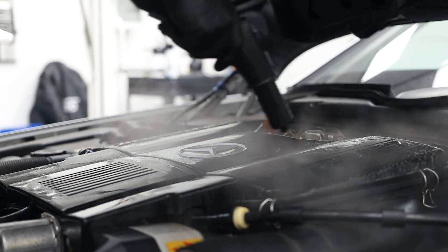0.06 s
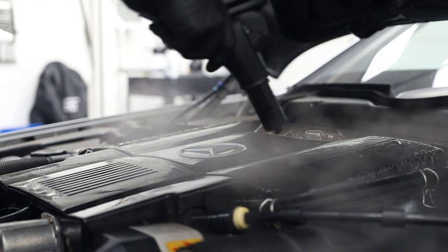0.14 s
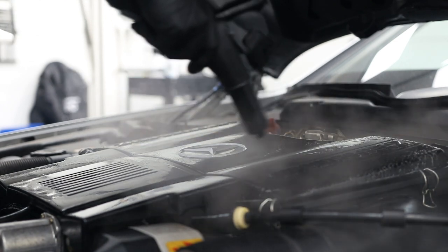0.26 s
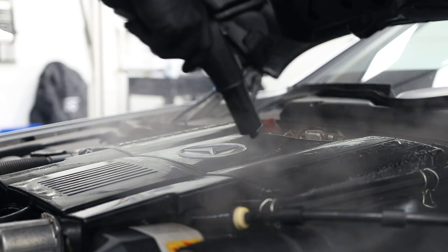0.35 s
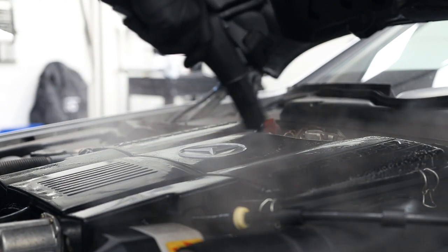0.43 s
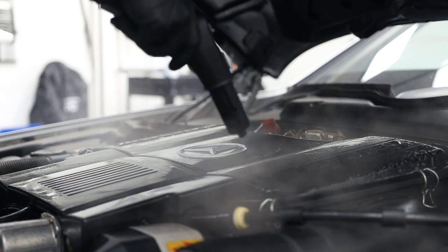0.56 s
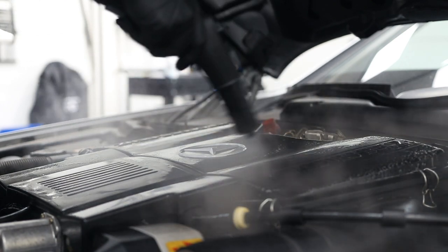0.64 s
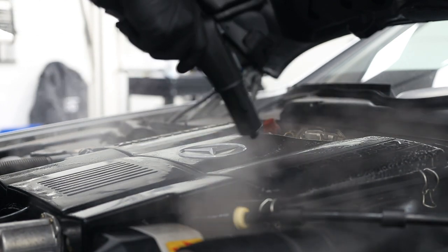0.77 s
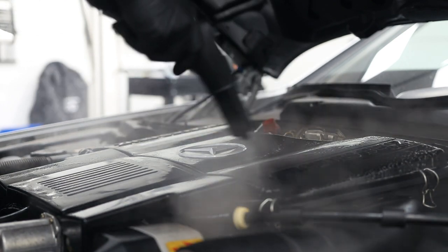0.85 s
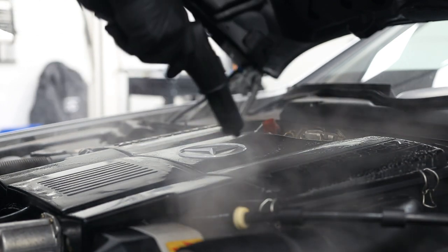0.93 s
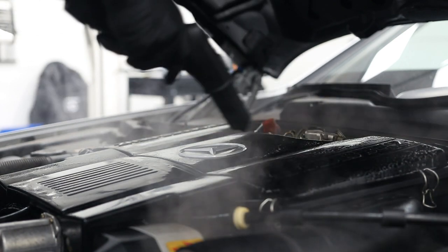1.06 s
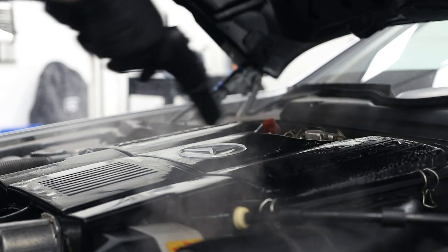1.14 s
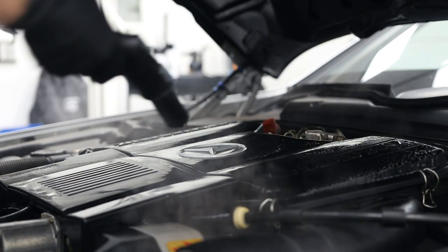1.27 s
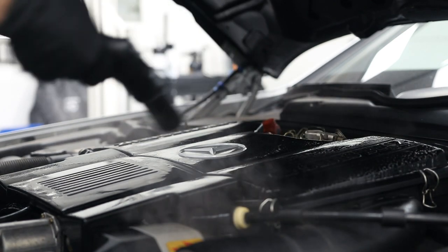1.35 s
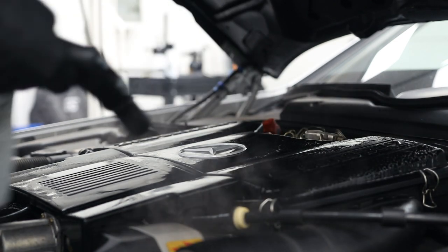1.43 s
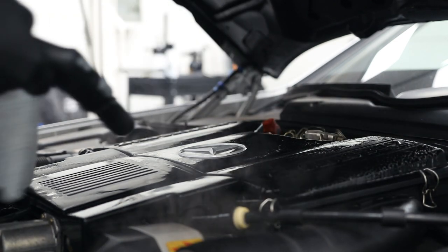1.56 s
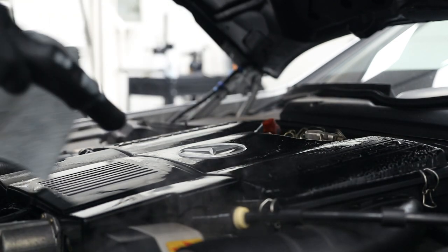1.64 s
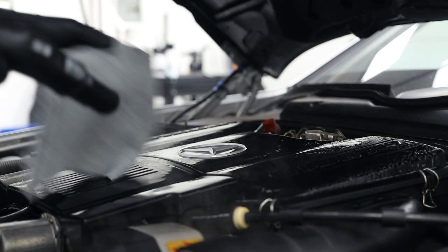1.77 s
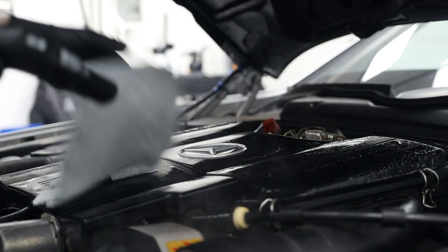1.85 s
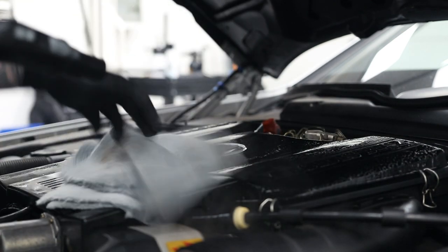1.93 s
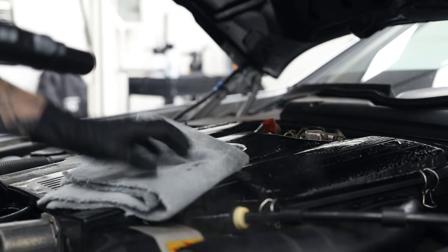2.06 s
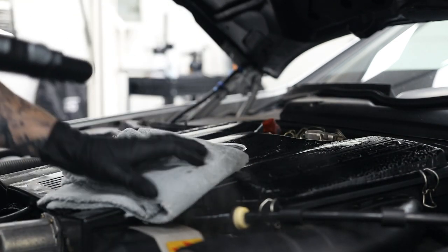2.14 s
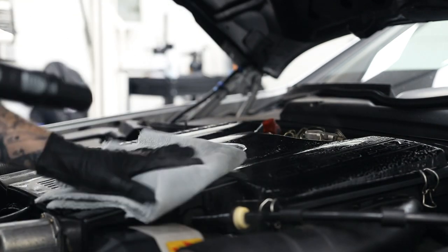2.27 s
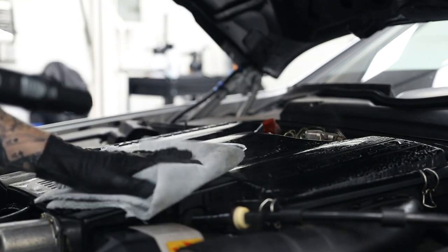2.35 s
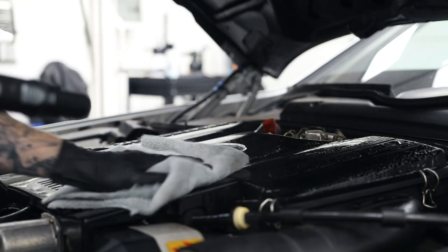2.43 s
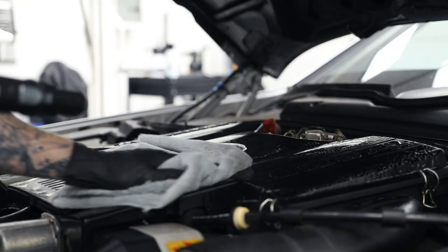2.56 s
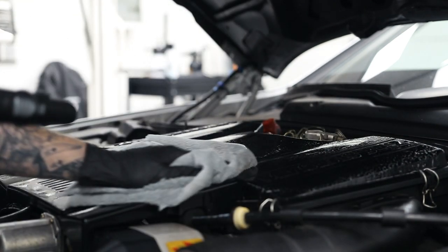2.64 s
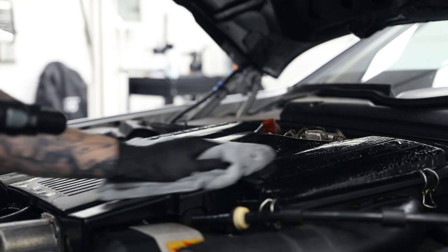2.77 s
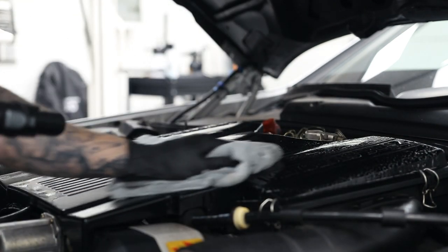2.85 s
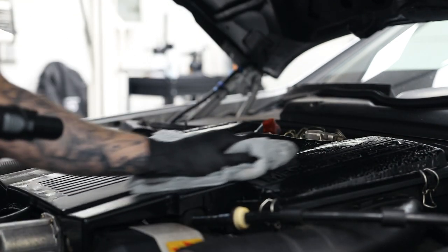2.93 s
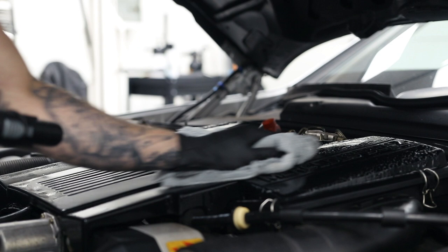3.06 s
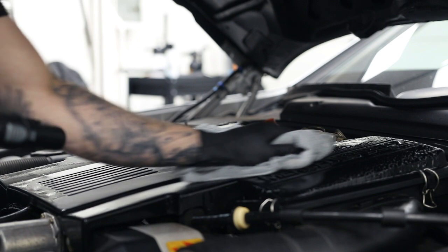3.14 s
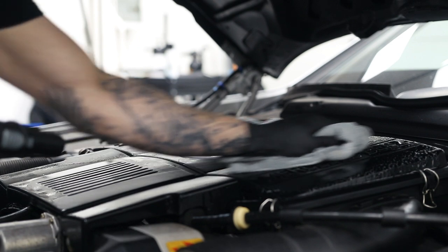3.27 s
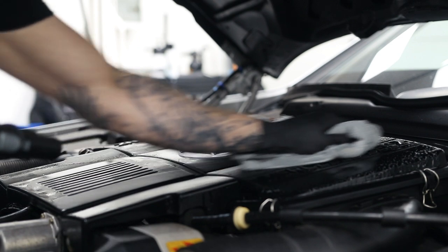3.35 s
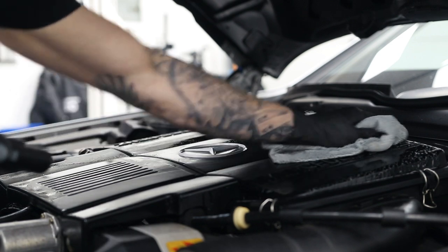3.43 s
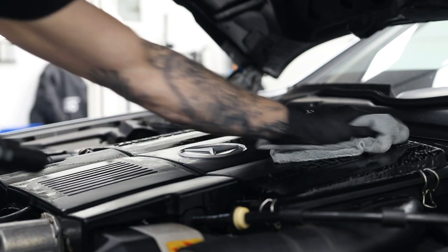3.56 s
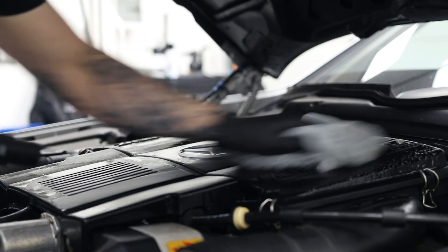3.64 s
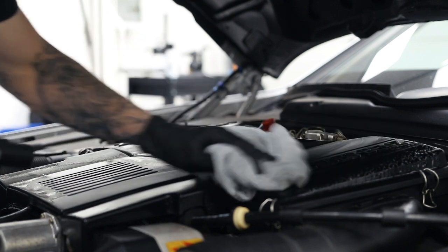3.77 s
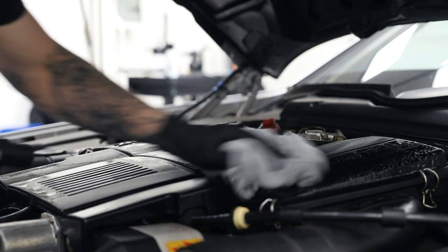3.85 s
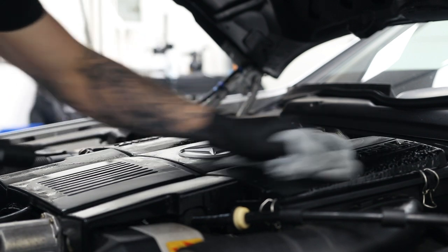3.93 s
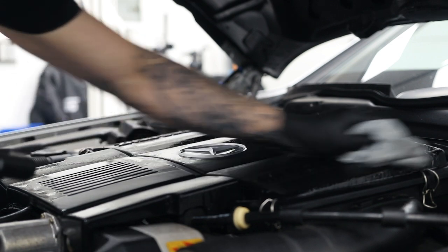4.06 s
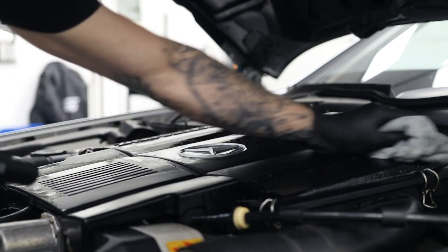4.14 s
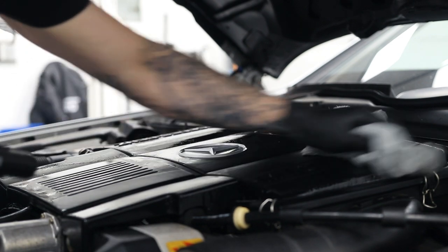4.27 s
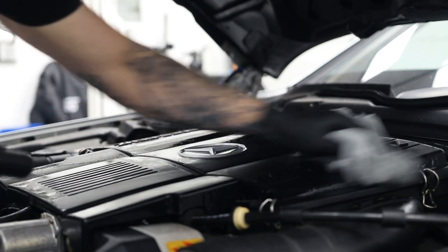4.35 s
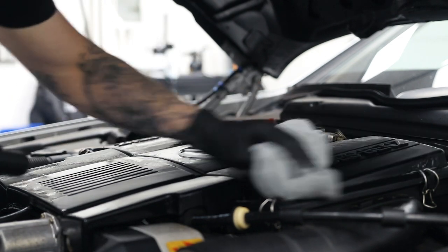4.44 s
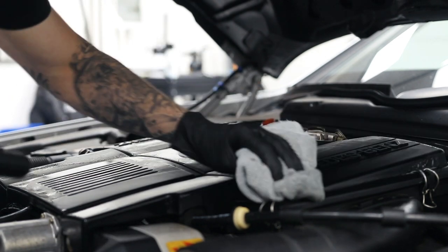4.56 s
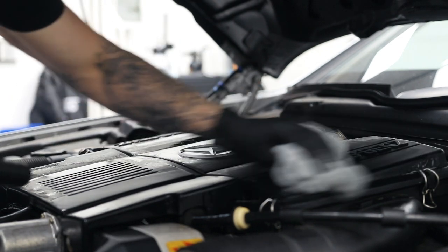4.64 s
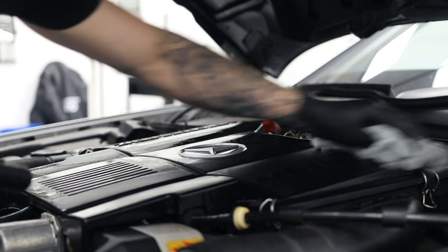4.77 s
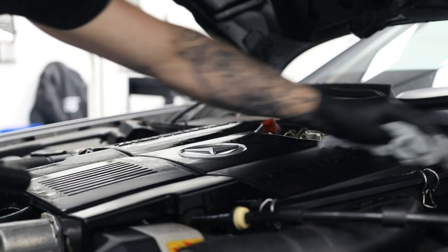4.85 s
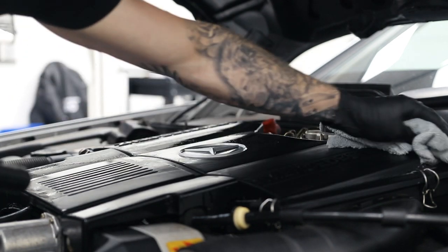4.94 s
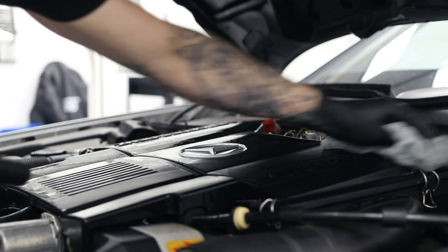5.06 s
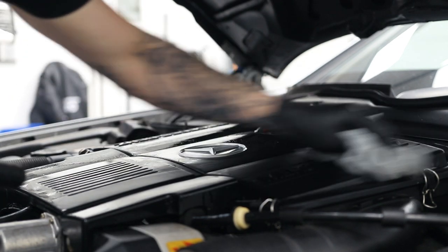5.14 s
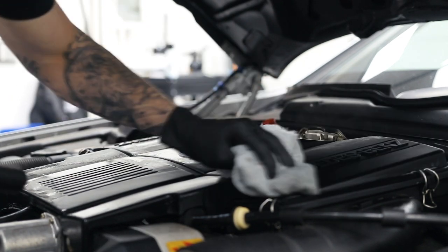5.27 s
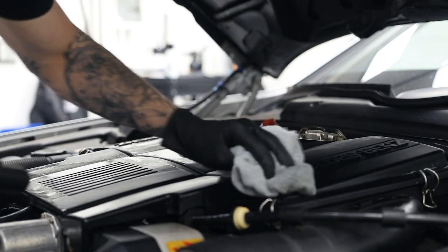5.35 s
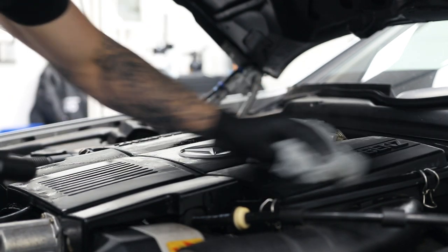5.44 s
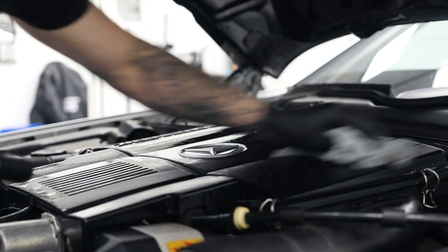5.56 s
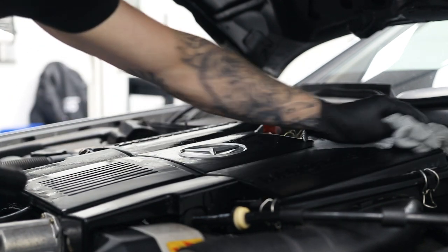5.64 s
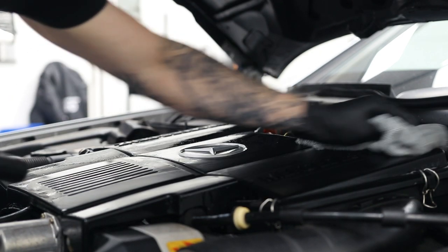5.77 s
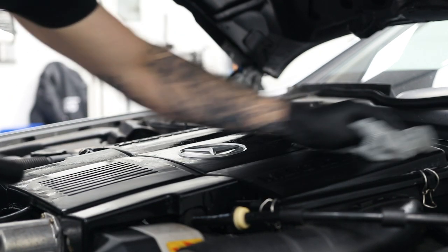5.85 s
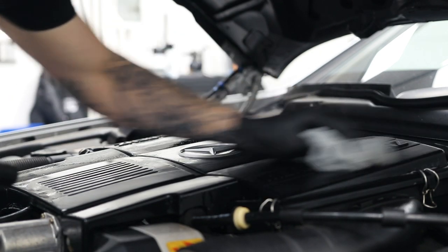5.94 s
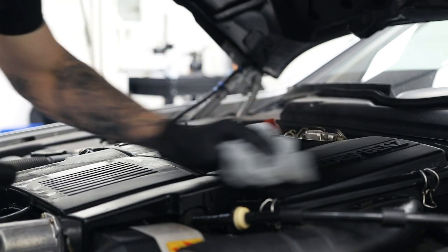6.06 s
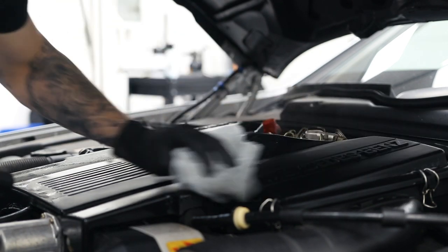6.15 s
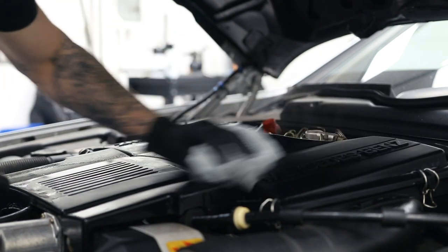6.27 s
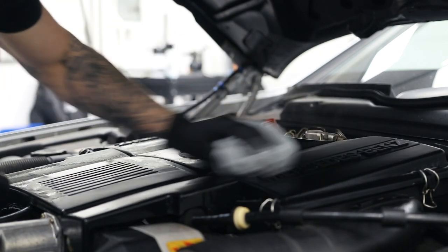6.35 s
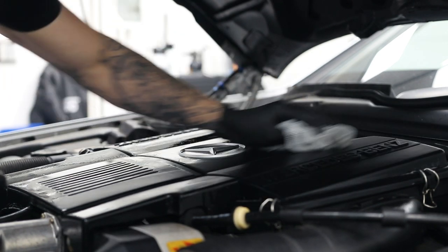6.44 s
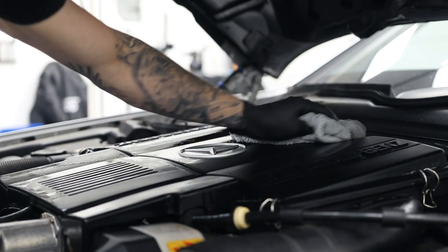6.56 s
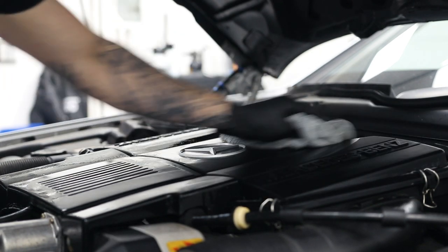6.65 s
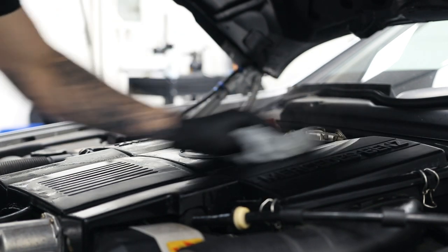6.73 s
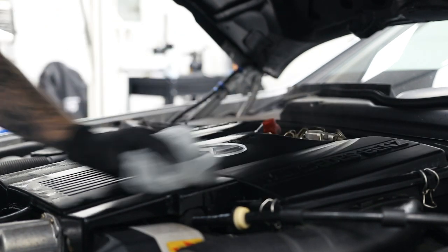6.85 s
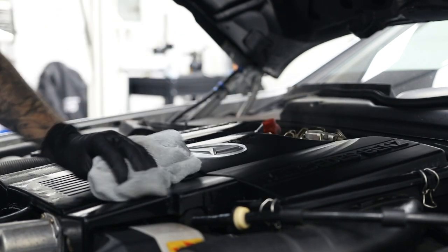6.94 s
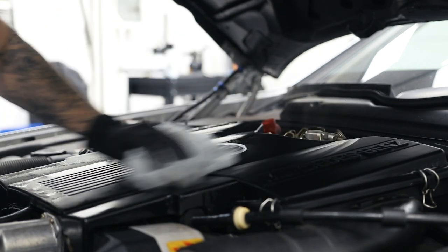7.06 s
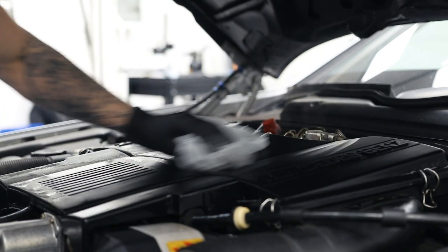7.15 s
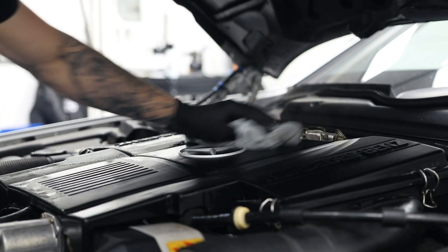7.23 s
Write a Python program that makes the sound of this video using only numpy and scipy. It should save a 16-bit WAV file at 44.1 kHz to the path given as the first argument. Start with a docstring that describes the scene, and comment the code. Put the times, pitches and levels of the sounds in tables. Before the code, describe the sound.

A steam cleaner hisses loudly onto a plastic engine cover for about a second, then its valve shuts with a dull pop. The nozzle gives a tiny squeak and a few light knocks and scrapes. A towel settles with a faint swish and wipes to and fro in quiet strokes, sometimes catching with hollow thuds and short groans. A close microphone picks it up in a garage with slight reverberation.

```python
"""A steam cleaner hisses onto a plastic engine cover in a garage until its valve snaps shut.
The turbulent jet rings the nozzle and splashes on the plastic. The nozzle then scrapes and knocks,
exciting the modes of the cover. A towel is laid down and wiped to and fro: its fibres hiss, and
under pressure stick-slip friction drums the hollow cover. One close microphone hears it all."""
import sys
import numpy as np
from scipy import signal
from scipy.fft import rfft, irfft
from scipy.io import wavfile
from scipy.ndimage import map_coordinates

SR = 44100
rng = np.random.default_rng(int(sys.argv[2]) if len(sys.argv) > 2 else 0)


def digitize_waveform(pressure):
    """Quantize a signal to 16-bit integers and store it at the path in sys.argv[1].

    Rows of a 2-D input are taken as channels; values are limited to [-1, 1].
    """
    field = np.atleast_2d(pressure).T
    bounded = np.clip(field, -1, 1)
    quanta = np.round(bounded * 32767).astype(np.int16)
    wavfile.write(sys.argv[1], SR, quanta)


N = 321930
T = np.arange(N) / SR

# The course of the jet. Each row: time in seconds, hiss level in dB, then the splash, the low nozzle
# ring and the high nozzle ring in dB relative to the hiss.
JET_LEVELS = [(0, -31, -9.5, -19, -17), (.2, -32, -9.5, -7.5, -9), (.38, -31.5, -11, -10.5, -12),
              (.45, -32, -10.5, -9.5, -5.5), (.5, -32.5, -12, -10, -16), (.65, -32.5, -10, -8, -9.5),
              (.735, -33.5, -7.5, -8, -16.5), (.785, -33, -11, -8, -10), (.85, -32.5, -10, -11, -12.5),
              (.905, -34.5, -9, -5.5, -12), (.96, -36, -11.5, -11.5, -17)]
# Spectra of the steam. Each row: frequency in Hz, relative level in dB.
HISS_SPECTRUM = [(1500, -34), (3200, -9.5), (3800, -2), (5200, -2), (6300, -3.5), (8000, -1), (12000, -1.5),
                 (15500, -2)]
SPLASH_SPECTRUM = [(40, -43.5), (100, -19), (250, -11.5), (400, -14.5), (600, -5), (810, 1.5), (1300, -3),
                   (1700, -2.5), (3000, -3.5), (5000, -18)]
SEEP_SPECTRUM = [(2500, -8), (3600, -18.5), (4100, -2.5), (4700, -12), (7000, -25.5), (14000, -34)]
# Nozzle resonances; the low or the high set takes over as the tip tilts on the cover.
# Each row: frequency in Hz, bandwidth in Hz, relative gain in dB.
NOZZLE_LOW_MODES = [(4167, 100, -0.5), (4330, 120, -4.5), (7930, 190, -7.5)]
NOZZLE_HIGH_MODES = [(4680, 130, -1.5), (4935, 160, 0), (8900, 300, -6.5)]
# Reflections of the hiss from cover and bonnet. Each row: delay in milliseconds, gain in dB.
HISS_ECHOES = [(1.03, -22.5), (1.33, -16), (1.78, -15)]
# The travel of the nozzle. Each row: time in seconds, extra delay of the reflections in milliseconds.
ECHO_SHIFT = [(0, -0.08), (.3, 0.097), (.65, .05), (.96, -0.31)]
# The pop of the valve. Each row: frequency in Hz, relative level in dB, decay time in seconds.
VALVE_MODES = [(730, 5.0, 0.0022), (563, 1.5, 0.0021), (164, -5, 0.0022)]
# The ringing of the struck cover. Each row: frequency in Hz, relative level in dB, T60 in seconds.
COVER_MODES = [(219, -17, 0.15), (260, 4, 0.2), (304, 3.5, 0.19), (414, 2, 0.17), (530, -9, 0.098),
               (628, -11, 0.18), (666, 4.5, 0.19), (900, 0, 0.037), (996, 7, 0.066), (1055, -1, .16),
               (1194, 1.5, 0.064), (1368, -4, 0.06), (1635, -7, 0.1), (1850, 0, 0.084)]
# Damped resonances of the hollow cover under the hand, of its flat panel and of hard plastic ticks.
# Each row: frequency in Hz, bandwidth in Hz, relative gain in dB.
HOLLOW_MODES = [(148, 44, -9), (229, 32, -2.5), (251, 16, 4.5), (296, 30, 2)]
PANEL_MODES = [(463, 180, 8.5), (650, 260, 4.5), (800, 46, -15)]
TICK_MODES = [(2200, 780, 9), (3580, 690, -1), (4400, 500, 2), (5730, 520, -12)]
# Nozzle and hand knock on the cover. Each row: start in seconds, level in dB, decay time in seconds,
# centre frequency of the contact in Hz, then ring and tick in dB relative to the push.
COVER_KNOCKS = [(1.182, -40.5, 0.023, 1210, -3.5, -14.5), (1.194, -44.5, 0.014, 990, 0.5, -8.5),
                (1.319, -49.5, 0.013, 1060, -3, -18), (1.496, -56.5, 0.015, 790, -6.5, -28),
                (1.619, -44.5, 0.0032, 840, -2.5, -10.5), (1.657, -57, 0.0023, 1100, -11, -6),
                (1.725, -51, 0.0027, 1000, -12, -15), (1.745, -53, 0.0022, 1400, -20, -16),
                (1.839, -57, .004, 1000, -5, -11), (1.886, -51, 0.009, 800, -4, -28.5),
                (2.24, -59, 0.0016, 685, -17.5, -7), (2.259, -53, 0.0016, 790, -9, -25),
                (2.341, -62.5, 0.011, 666, -6, -24), (2.441, -55.5, 0.012, 710, -2, -24),
                (2.581, -47.5, 0.0085, 604, -11, -14), (2.593, -50, 0.015, 346, -11, -30),
                (6.831, -50.5, 0.012, 650, -7, -28)]
# Scrapes along the cover. Each row: start in seconds, level in dB, rise and length in seconds,
# centre frequency of the contact in Hz, ring in dB relative to the push.
COVER_SCRAPES = [(1.039, -47, 0.00083, 0.053, 1070, -1), (1.623, -57, 0.00095, 0.041, 800, -3),
                 (1.663, -54, 0.039, 0.1, 870, -5.5), (1.908, -65.5, 0.009, 0.042, 575, -14)]
# Spectra of the towel. Each row: frequency in Hz, relative level in dB.
RUB_SPECTRUM = [(100, -11.5), (250, -14.5), (400, -9), (600, -3.5), (820, 4), (1190, -1.5), (1700, -1),
                (3180, -8), (4180, -5.5), (5600, -16), (15000, -27.5)]
FIBRE_SPECTRUM = [(2500, 6), (4200, 6.5), (5500, 2), (8000, -0.5), (12000, -3.5), (15500, -7.5)]
SWISH_SPECTRUM = [(500, -6), (1500, -6.5), (3000, -3), (4100, 3.5), (6000, -7), (10000, -13), (15000, -17)]
# Strokes of the towel. Each row: start, length, speeding up and slowing down in seconds, rubbing at
# full speed in dB, fibre hiss in dB relative to it, drumming at full speed and pressure in dB, delay
# and half-length of the hardest push in seconds, judder in dB relative to the drumming.
TOWEL_STROKES = [(2.287, 1.247, 1.24, 0.14, -59, -13, -62, 0.8, 0.012, -12),
                 (3.507, 0.32, 0.15, 0.087, -59, -14.5, -59, 0.21, 0.09, -4.5),
                 (3.833, 0.37, 0.14, 0.095, -60.5, -6.5, -55.5, 0.24, 0.12, -4),
                 (4.242, 0.29, 0.09, 0.07, -59.5, -9, -58, 0.14, 0.075, -1.5),
                 (4.579, 0.36, 0.041, 0.028, -59.5, -7, -64.5, 0.15, 0.1, -3.5),
                 (5.002, 0.33, 0.072, 0.079, -56.5, -14, -55, 0.21, 0.058, -1.5),
                 (5.355, 0.374, 0.097, 0.074, -56.5, -12, -50.5, 0.16, 0.086, 0),
                 (5.717, 0.5, 0.16, 0.13, -57.5, -12, -57, 0.25, 0.1, 1.5),
                 (6.18, 0.4, 0.19, 0.086, -57.5, -5.5, -61, 0.17, 0.06, -6),
                 (6.595, 0.39, 0.084, 0.3, -57, -4.5, -64, 0.23, 0.094, 1.5),
                 (6.925, 0.48, 0.29, 0.11, -57.5, -5.5, -60.5, .24, 0.086, -3)]
# The cloth grips and judders. Each row: start in seconds, length in seconds, level in dB.
TOWEL_GRABS = [(3.061, 0.056, -65), (4.315, 0.11, -60), (5.163, 0.066, -52), (5.468, 0.042, -47),
               (5.514, 0.035, -48), (5.877, 0.18, -53)]
# The towel catches on ribs and edges. Each row: start in seconds, peak level in dB, cutoff of the
# push in Hz, decay time of the scuff in seconds.
TOWEL_CATCHES = [(4.049, -43, 900, .002), (4.112, -37, 1000, 0.0016), (5.415, -37.5, 696, 0.015),
                 (5.491, -34, 600, 0.0075), (5.524, -35.5, 420, 0.0044), (5.567, -36, 1500, 0.0053),
                 (5.589, -40, 1100, .005), (5.62, -38.5, 900, .01), (5.963, -41, 700, .006),
                 (6.12, -38.5, 1400, 0.017), (6.229, -45.5, 500, 0.026), (6.308, -39.5, 1800, 0.021)]
# The colouring of the background air. Each row: frequency in Hz, relative gain in dB.
AIR_SPECTRUM = [(30, -12), (90, 3), (250, -1), (400, -9.5), (800, -2.5), (1500, -10.5), (3000, -12.5),
                (7000, -21), (11500, -24.5), (15000, -28)]

VALVE_SHUT_S = 0.971


def steam():
    """Jet noise: turbulence hisses, rings the nozzle and splashes; a faint seep outlasts the jet."""
    jet_db, splash_db, low_db, high_db = curves(JET_LEVELS)
    hiss = colour(reflected(turbulence(depth_db=1.5, rate=10.8, width_hz=260)), HISS_SPECTRUM)
    low = unit(resonate(rng.standard_normal(N), NOZZLE_LOW_MODES))
    high = unit(resonate(rng.standard_normal(N), NOZZLE_HIGH_MODES))
    nozzle = amp(low_db + 1.1 * walk(30)) * low + amp(high_db + 1.1 * walk(30)) * high
    splash = colour(turbulence(depth_db=2.0, rate=23.0, width_hz=306), SPLASH_SPECTRUM)
    since_shut = np.maximum(T - VALVE_SHUT_S, 0)
    flow = amp(jet_db + .5 * walk(70)) * np.exp(-since_shut / 0.0024)
    jet = flow * (hiss + nozzle + amp(splash_db) * splash)
    # The wand empties with a soft rush, too weak to ring the nozzle.
    rush = unit(band(rng.standard_normal(N), 3800, 5000))
    emptying = amp(-57) * (since_shut > 0) * np.exp(-since_shut / 0.048) * rush
    seep_fade = np.exp(-since_shut / 0.5) * np.interp(T, [1.6, 1.7], [1, 0])
    seep = amp(-66) * seep_fade * colour(rng.standard_normal(N), SEEP_SPECTRUM)
    return jet + emptying + seep


def reflected(x):
    """Comb filtering: echoes interfere with the direct hiss, and the peaks slide as the nozzle moves."""
    shift_ms, = curves(ECHO_SHIFT)
    return x + sum(amp(db) * map_coordinates(x, [(T - (ms + shift_ms) / 1000) * SR], order=3)
                   for ms, db in HISS_ECHOES)


def valve():
    """Impulse response: the closing valve excites heavily damped modes in one dull, hollow pop."""
    age = np.maximum(T - VALVE_SHUT_S + 0.00065, 0)
    pop = sum(amp(db) * np.sin(2 * np.pi * hz * age) * np.exp(-age / decay)
              for hz, db, decay in VALVE_MODES)
    return amp(-25) * pop * (1 - np.exp(-age / 0.0015))


def contacts():
    """Impact and sliding friction: knocks strike at once and die away; scrapes grip, then let go."""
    knocks = sum(touch(start, db, hz, ring_db, tick_db, rise=0.00018, length=0.52 * decay, decay=decay)
                 for start, db, decay, hz, ring_db, tick_db in COVER_KNOCKS)
    scrapes = sum(touch(start, db, hz, ring_db, tick_db=-17, rise=rise, length=length, decay=0.019)
                  for start, db, rise, length, hz, ring_db in COVER_SCRAPES)
    return knocks + scrapes


def touch(start, db, hz, ring_db, tick_db, rise, length, decay, size=22050):
    """Modal excitation: one contact chatters on the plastic and leaves the cover ringing."""
    t = np.arange(size) / SR
    ring = sum(amp(mode_db) * np.sin(2 * np.pi * mode_hz * t) * die_away(t, t60)
               for mode_hz, mode_db, t60 in COVER_MODES)
    grip = np.minimum(t / rise, 1) * np.exp(-np.maximum(t - length, 0) / decay)
    chatter = (unit(slips(rate=3000, spread_db=1, size=size)) + rng.standard_normal(size)) * grip
    push = lowpass(band(chatter, hz, 0.64 * hz), 2 * hz, order=5)
    # The ticks stop as the grip loosens, while the hollow under the cover booms on.
    ticks = lowpass(resonate(chatter * grip, TICK_MODES), 5900, order=4)
    boom = band(band(rng.standard_normal(size), 310, 260), 310, 260) * np.exp(-t / 0.057)
    # The first impact sets the modes ringing and the chatter keeps them going.
    struck = unit(band(ring, hz, 1.2 * hz))
    driven = unit(signal.fftconvolve(push, ring)[:size])
    cavity = unit(signal.fftconvolve(chatter, boom)[:size])
    body = unit(struck + 0.91 * driven) + amp(-3.5) * cavity
    sound = unit(push) + amp(tick_db) * unit(ticks) + amp(ring_db) * body
    return place(amp(db) * unit(sound) * np.sqrt(np.mean(grip ** 2)), start)


def squeak(hz=985):
    """Friction-driven oscillation: the wet nozzle catches and sings briefly near a mode of the cover."""
    phase = 2 * np.pi * np.cumsum(hz * (1 + 0.0144 * walk(130.6))) / SR
    envelope = glide(start=1.036, length=0.074, rise=.003, fall=.022)
    return amp(-46 + 1.3 * walk(89.6)) * envelope * np.sin(phase)


def towel(rub_power=1.34, drum_power=2.5, arc_power=0.82, resting_pressure=0.16):
    """Friction noise grows with speed: fibres flick over the plastic; pressed cloth drums the cover."""
    rub_noise = unit(turbulence(depth_db=2.5, rate=14, width_hz=400))
    rub = colour(rub_noise + .5 * unit(slips(rate=3000, spread_db=0.5)), RUB_SPECTRUM)
    fibres = colour(rng.standard_normal(N) + 0.76 * unit(slips(rate=13000, spread_db=0)), FIBRE_SPECTRUM)
    stutter = band(slips(rate=1400, spread_db=3.5), 244, 810)
    hollow, judder = unit(resonate(stutter, HOLLOW_MODES)), unit(resonate(stutter, PANEL_MODES))
    sliding, drumming = 0, 0
    for (start, length, rise, fall, rub_db, fibre_db,
         drum_db, push_delay, push_half, judder_db) in TOWEL_STROKES:
        speed = glide(start, length, rise, fall)
        arc = glide(start, length, length / 2, length / 2)  # the fibres hiss most in mid-stroke
        push = np.exp(-.5 * ((T - start - push_delay) / push_half) ** 2)
        pressure = resting_pressure + (1 - resting_pressure) * push
        fibre_hiss = amp(fibre_db) * np.sqrt(speed) * arc ** arc_power * fibres
        sliding += amp(rub_db) * (speed ** rub_power * rub + fibre_hiss)
        drumming += amp(drum_db) * speed ** drum_power * pressure * (hollow + amp(judder_db) * judder)
    # The grip of the cloth wavers.
    return amp(0.85 * walk(60) + 0.51 * walk(20)) * sliding + amp(1.3 * walk(25)) * drumming


def grabs(slip_hz=262, wobble=.11, edge_s=0.012):
    """Stick-slip motion: the damp cloth slips in step with the hollow of the cover, which groans."""
    cycles = np.cumsum(slip_hz * (1 + wobble * walk(150))) / SR
    pulses = np.diff(np.floor(cycles), prepend=0) * amp(2 * walk(110))
    hollow = unit(band(band(pulses, slip_hz, 130), slip_hz, 130))
    groan = hollow + amp(-13) * unit(resonate(pulses, PANEL_MODES))
    return groan * sum(amp(db) * glide(start, length, edge_s, edge_s) for start, length, db in TOWEL_GRABS)


def catches(size=8192):
    """Impulsive excitation: the towel snags and lets go, with a thud in the damped cover and a scuff."""
    out, t = np.zeros(N), np.arange(size) / SR
    for start, db, cutoff_hz, decay in TOWEL_CATCHES:
        scuff = 0.067 * rng.standard_normal(size) * np.exp(-t / decay)
        push = lowpass((t == 0) + scuff, cutoff_hz)
        panel = amp(-10.5) * resonate(push, PANEL_MODES)
        thud = resonate(push, HOLLOW_MODES) + panel + 0.27 * band(push, 510, 1200)
        out += place(amp(db) * thud / np.abs(thud).max(), start)
    return out


def swish(start=2.046):
    """Light friction: the cloth settles with a swish and rustles on while the hand flattens it."""
    landing = amp(-68.5) * glide(start, length=0.22, rise=0.085, fall=0.088)
    rustle = amp(-75.5) * glide(start, length=1, rise=.5, fall=.5)
    return np.hypot(landing, rustle) * colour(rng.standard_normal(N), SWISH_SPECTRUM)


def garage(x, wet_db, low_t60, high_t60, size=32768):
    """Reverberation: the room adds a diffuse tail in which the treble dies first."""
    t, noise = np.arange(size) / SR, rng.standard_normal(size)
    low = lowpass(noise, 1500, order=1)
    tail = low * die_away(t, low_t60) + (noise - low) * die_away(t, high_t60)
    tail *= t > .005
    return x + amp(wet_db) * signal.fftconvolve(x, tail / np.linalg.norm(tail))[:N]


def air():
    """Ambient noise: a restless low murmur of air lies under an even hiss."""
    murmur = lowpass(unit(turbulence(depth_db=2.5, rate=9.1, width_hz=220)), 1130, order=1)
    noise = rng.standard_normal(N)
    hiss = noise - lowpass(noise, 1200, order=1)
    return amp(-72.5) * colour(murmur + hiss, AIR_SPECTRUM)


def turbulence(depth_db, rate, width_hz):
    """Random modulation: neighbouring bands of noise swell and fade independently."""
    f, t, spectrum = signal.stft(rng.standard_normal(N), SR, nperseg=512)
    eddies = rng.standard_normal((256, 512))
    grid = np.meshgrid(f / width_hz, t * rate, indexing="ij")
    swell = map_coordinates(eddies, grid, order=1, mode="wrap")
    return signal.istft(spectrum * amp(depth_db * swell), SR)[1][:N]


def slips(rate, spread_db, size=N):
    """Shot noise: tiny pushes of uneven strength, on average `rate` per second."""
    chance, strength = rng.random(size), rng.standard_normal(size)
    return (chance < rate / SR) * rng.choice([-1, 1], size) * amp(spread_db * np.clip(strength, -2, 2))


def walk(rate):
    """Slow fluctuation: a line through `rate` random values per second, with a spread near 1."""
    points = rng.standard_normal(int(N / SR * rate) + 2)
    return map_coordinates(points, [T * rate], order=1) * np.sqrt(3 / 2)


def glide(start, length, rise, fall):
    """Quarter-sine envelope, 0 to 1: a motion gathers pace and comes to rest."""
    up, down = np.clip((T - start) / rise, 0, 1), np.clip((start + length - T) / fall, 0, 1)
    return np.sin(np.pi / 2 * up) * np.sin(np.pi / 2 * down)


def die_away(t, t60):
    """Exponential decay by 60 dB in t60 seconds."""
    return np.exp(-np.log(1000) * t / t60)


def place(sound, start):
    """Time shift: a short sound begins at `start` seconds."""
    return np.pad(sound, (int(start * SR), N))[:N]


def curves(table):
    """Linear interpolation of each column through time."""
    times, *columns = np.transpose(table)
    return [np.interp(T, times, column) for column in columns]


def colour(x, spectrum):
    """Spectral shaping by (Hz, dB) points, scaled to rms 1."""
    hz, db = np.transpose(spectrum)
    f = np.maximum(np.fft.rfftfreq(len(x), 1 / SR), 1)
    gain = amp(np.interp(np.log(f), np.log(hz), db)) * np.minimum(f / hz[0], 1)
    return unit(irfft(rfft(x) * gain, len(x)))


def resonate(x, modes):
    """Superposition of (Hz, bandwidth, dB) resonances."""
    return sum(amp(db) * band(x, hz, width) for hz, width, db in modes)


def band(x, hz, width):
    """A single resonance, with gain 1 at its centre."""
    return signal.lfilter(*signal.iirpeak(hz, hz / width, fs=SR), x)


def lowpass(x, hz, order=2):
    """Attenuation of the treble above a cutoff."""
    return signal.sosfilt(signal.butter(order, min(hz, .45 * SR), fs=SR, output="sos"), x)


def amp(db):
    """Amplitude ratio of a level in decibels."""
    return 10 ** (np.asarray(db) / 20)


def unit(x):
    """Normalisation to rms 1."""
    return x / np.sqrt(np.mean(x ** 2))


def scene():
    """Superposition: the work, its reverberation and the air add at one point, alike in both channels."""
    work = steam() + valve() + contacts() + squeak() + swish() + towel() + grabs() + catches()
    in_room = garage(work, wet_db=-14.5, low_t60=0.53, high_t60=0.29)
    return np.tile(in_room + air(), (2, 1))


def record(dry, bass_hz=55, top_hz=15750):
    """Band limiting: the microphone sheds the deepest bass and the recorder cuts the top."""
    thin = signal.sosfilt(signal.butter(2, bass_hz, "high", fs=SR, output="sos"), dry)
    return signal.sosfilt(signal.ellip(12, .1, 80, top_hz, fs=SR, output="sos"), thin)


dry = scene()
out = record(dry)
digitize_waveform(out)
```